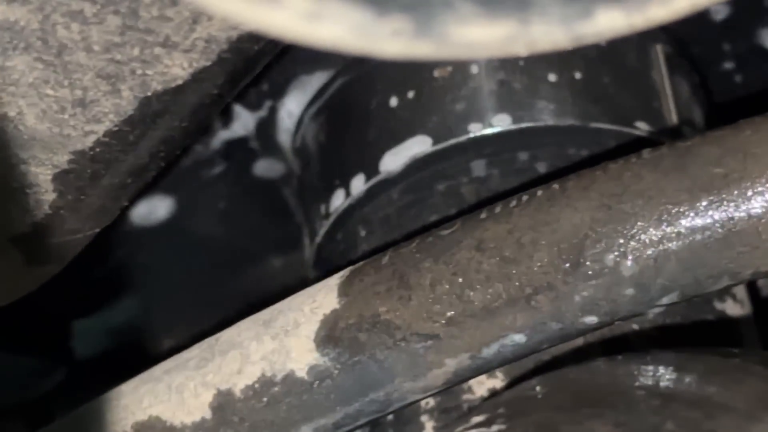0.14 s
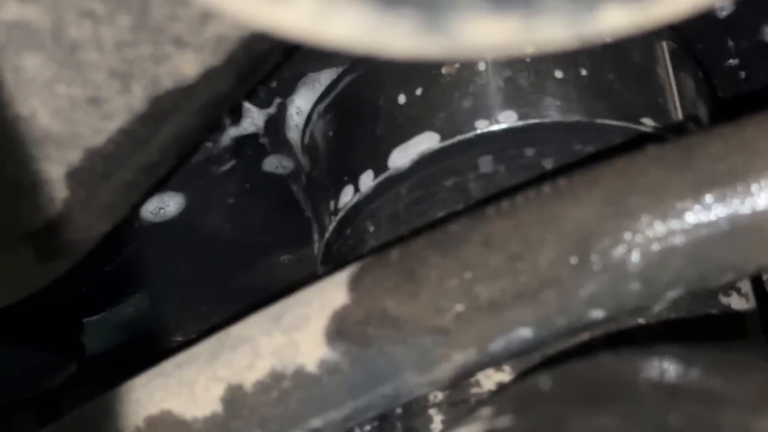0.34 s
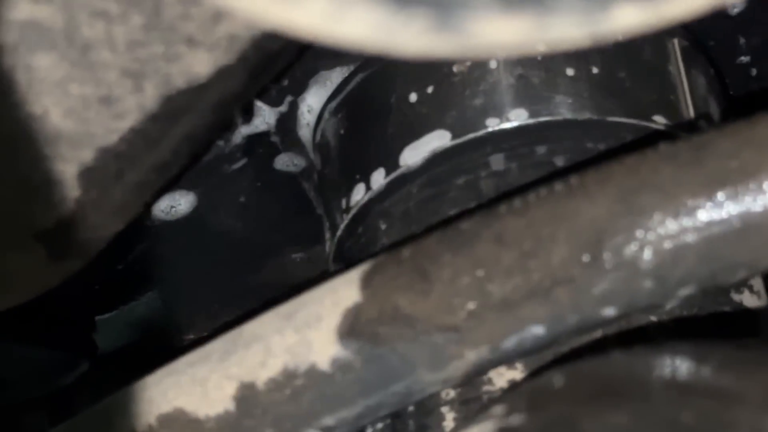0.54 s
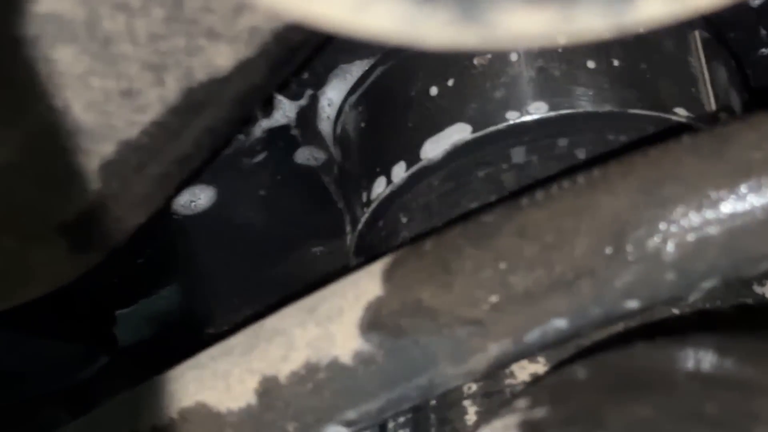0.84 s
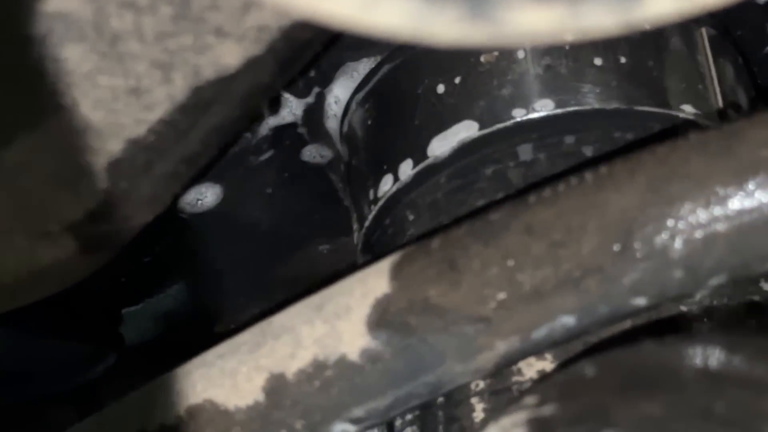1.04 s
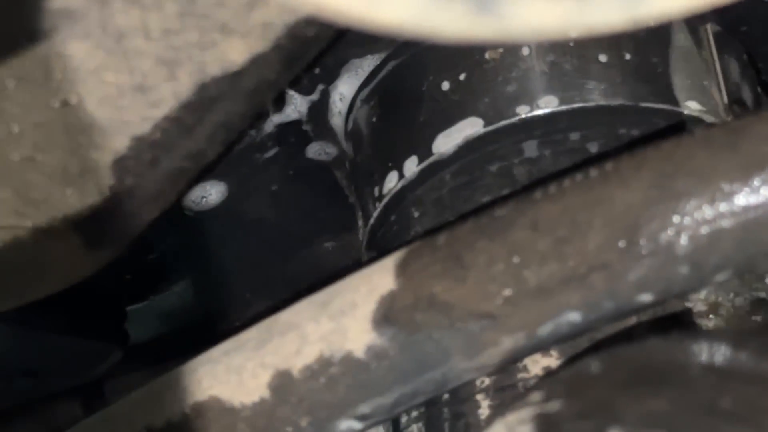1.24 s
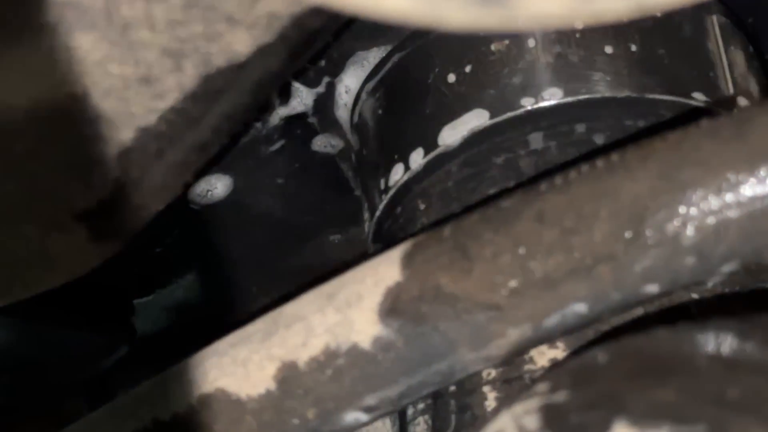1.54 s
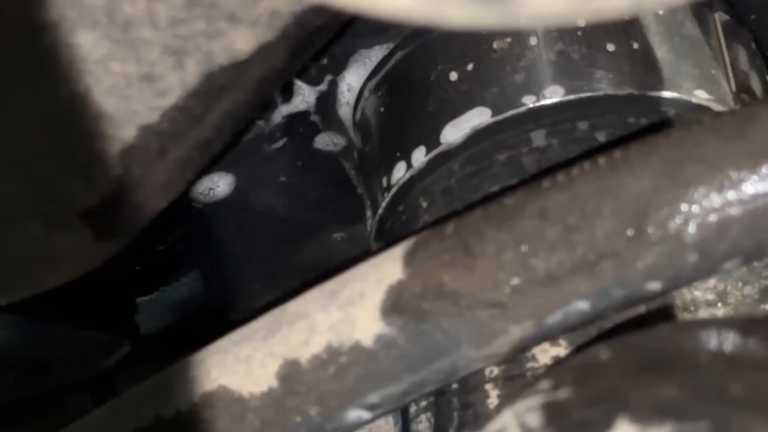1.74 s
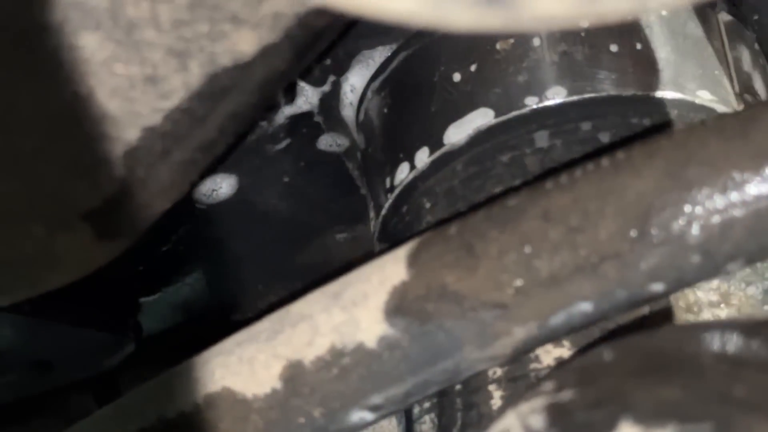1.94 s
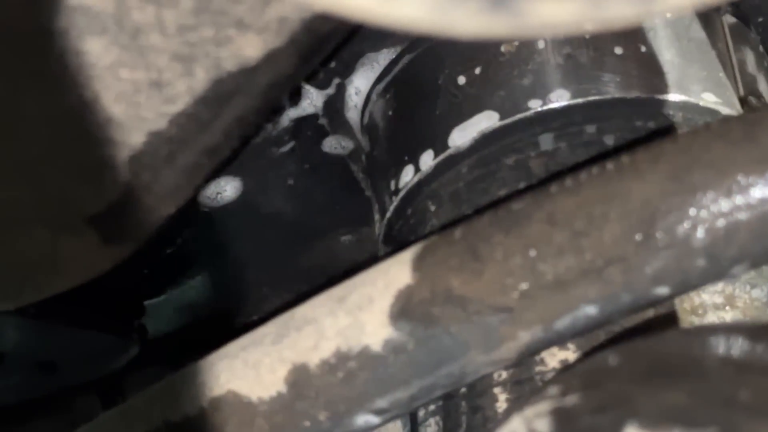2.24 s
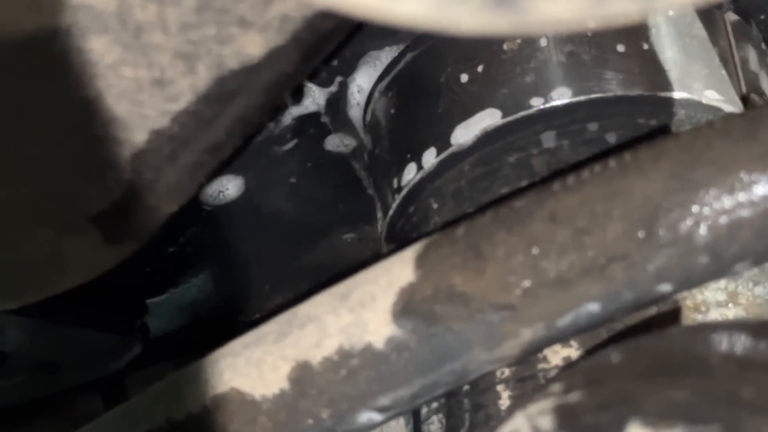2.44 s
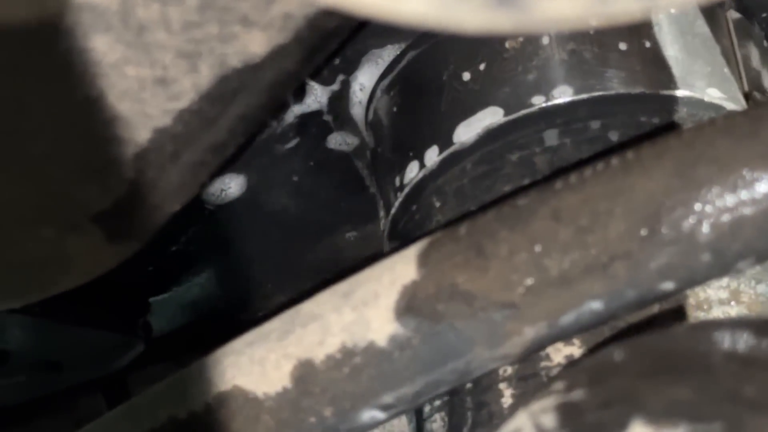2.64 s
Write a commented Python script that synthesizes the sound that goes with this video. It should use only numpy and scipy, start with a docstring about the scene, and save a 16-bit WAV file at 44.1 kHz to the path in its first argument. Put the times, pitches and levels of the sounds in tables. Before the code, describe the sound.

A constant high, sizzling air leak at a pipe clamp, close up in a workshop, flickers slightly throughout; small wet ticks and a few dull hand knocks come after one second, faint rumble and hum beneath.

```python
"""In a workshop, compressed air escapes steadily from the joints of a pressurised intake pipe near the microphone.
The fluttering jet is shaped noise with clicks for droplets of test fluid; band-passed noise gives the
resonances of the pipe and of the narrow gaps at its clamp. Nearby metal scatters it as dense decaying echoes.
Damped sines and a dull scuff make a few soft handling bumps; low noise and a sine make the rumble and mains hum."""
import sys
import numpy as np
from scipy import signal
from scipy.fft import rfft, irfft
from scipy.io import wavfile

SR = 44100
rng = np.random.default_rng(int(sys.argv[2]) if len(sys.argv) > 2 else 0)


def output_pcm(signal):
    """Save a mono or channel-first signal as 16-bit PCM at the path in sys.argv[1].

    Samples are clipped to [-1, 1] before scaling.
    """
    pcm = np.clip(np.atleast_2d(signal).T, -1, 1) * 32767
    wavfile.write(sys.argv[1], SR, np.round(pcm).astype(np.int16))


N = 123479

# broad spectrum of the jet, before its overall gain: f/Hz, relative level/dB
JET_SPECTRUM = [(900, -27), (1400, -23), (1750, -17.5), (2050, -25), (3000, -31.5), (3600, -29.5),
                (4000, -22), (4220, -29), (4500, -21), (4900, -18.5), (5900, -14), (6600, -6), (7600, -4),
                (8500, -15), (9300, -10), (10300, -3.5), (12000, 2), (14100, -4.5), (15000, -5.5),
                (15700, -7)]
# resonances of the pipe: f/Hz, width of one filter stage/Hz, mean peak level over the jet noise/dB
PIPE_RESONANCES = [(830, 85, 5.5), (1152, 92, 7.5), (2163, 32.6, 19.5), (2255, 83, 20.5), (2643, 127, 10.5),
                   (3273, 36, 16), (3791, 93, 14), (4330, 35, 11.5)]
# resonances of the gaps round the joint: f/Hz, width of one filter stage/Hz, mean peak level over the jet noise/dB
GAP_RESONANCES = [(6213, 67, 4.5), (6623, 290, 5), (6970, 73, 4), (7948, 110, 13.5), (8454, 490, 17.5),
                  (8914, 284, 15.5), (9527, 74, 13.5), (12620, 220, 7), (13380, 220, 9.5), (13900, 35, 17),
                  (13740, 280, 7.5), (14130, 250, 8.5), (14150, 150, 12.5), (15400, 170, 7.5)]
# big droplets: t/s, level against the jet noise/dB
BIG_DROPLETS = [(0.912, 24), (1.710, 17.5), (1.822, 22)]
# phase by which the right microphone port leads the left: f/Hz, phase/rad
PORT_LEAD = [(6100, 0), (7000, 1.0), (7450, 3.1), (7900, 5.1), (8200, 6.2), (9000, 5.8), (9600, 4.8),
             (10000, 4.0), (10600, 3.14), (11750, 3.14), (12100, 2.3), (13000, 1.4), (13700, .6),
             (14100, 0)]
# diffuse hiss, of opposite sign at the two ports: f/Hz, level against the direct hiss/dB
DIFFUSE_HISS = [(900, -1.5), (1150, -7), (1400, 7), (1900, -3), (2150, -41.5), (5800, -57), (7000, -8),
                (7450, -56), (7900, -8.5), (8500, -12), (9700, -21), (10300, -4), (10700, -90),
                (11700, -77), (12000, -12.5), (13300, -10), (14300, -17)]
# spectrum of the workshop rumble, before its overall gain: f/Hz, relative level/dB
RUMBLE_SPECTRUM = [(20, -84), (40, -75.5), (63, -61), (85, -63.5), (105, -69.5), (160, -71), (350, -77),
                   (500, -82), (850, -88), (1200, -106.5), (3000, -125)]
# left-right difference of the rumble: f/Hz, side level against mid/dB
RUMBLE_SIDE = [(25, -32), (60, -23), (120, -13), (280, -13), (450, -16), (900, -6)]
# modes of a bump, before onset and bump level: f/Hz, relative level/dB, T60/s
KNOCK_MODES = [(92, -3.5, 0.09), (164, -5, 0.066), (290, 0.5, 0.051), (334, -3, 0.043), (610, -22, .04),
               (825, -5, 0.041)]
# handling bumps: t/s, level/dB
HANDLING_BUMPS = [(1.192, -39), (1.248, -34.5), (1.281, -24.5), (1.824, -33)]

# _DB spreads are standard deviations; walk rates are in Hz
JET_DB = -15
FLUTTER_DB, FLUTTER_HZ = 0.29, 25
SWAY_DB, SWAY_HZ = 0.45, 3.2
DROPLETS_PER_S, DROPLET_MIN_DB, DROPLET_SIZE_DB = 180, 8, 3  # levels against the jet noise
SCATTER_DB, SCATTER_T60_S, SCATTER_DRIFT_HZ = -14, 0.13, 0.8  # level against the direct sound
SCUFF_HZ, SCUFF_WIDTH_HZ, SCUFF_DB, SCUFF_T60_S = 230, 310, -9, 0.099
BUMP_ATTACK_S = 0.009
RUMBLE_DB, RUMBLE_SWELL_DB, RUMBLE_SWELL_HZ = -0.4, 0.5, 24.0
HUM_HZ, HUM_DB, HUM_WAVER_DB, HUM_WAVER_HZ = 119.2, -53, 4, 1.6
HUM_PHASE_RAD, HUM_PHASE_HZ = 0.57, 2.4
TOP_HZ = 15760

TIME = np.arange(N) / SR
SIDES = np.array([[1], [-1]])  # left, right


def droplets():
    """Impulsive excitation: droplets torn off by the jet are random lone clicks, plus a few big ones."""
    chance, size = rng.random(N), rng.standard_normal(N)
    level_db = DROPLET_MIN_DB + DROPLET_SIZE_DB * np.minimum(abs(size), 3)
    clicks = (chance < DROPLETS_PER_S / SR) * np.sign(size) * undb(level_db)
    for start, db in BIG_DROPLETS:
        clicks[int(start * SR)] += undb(db)
    return clicks


def jet():
    """Turbulent noise and resonance: broadband flow noise, droplets and ringing cavities share one flutter."""
    air = rng.standard_normal(N) + droplets()
    for hz, width, db in list(PIPE_RESONANCES) + list(GAP_RESONANCES):
        ringing = irfft(noise() * resonance(hz, width), N)
        air = air + ringing * undb(db + SWAY_DB * walk(SWAY_HZ))
    fluttering = air * undb(FLUTTER_DB * walk(FLUTTER_HZ))
    return rfft(fluttering) * undb(JET_DB + curve(JET_SPECTRUM))


def reflections():
    """Multiple scattering: a dense, exponentially decaying cluster of echoes with unit energy."""
    tail = rng.standard_normal(N) * undb(-60 * TIME / SCATTER_T60_S)
    return rfft(tail / np.sqrt(np.sum(tail ** 2)))


def leak():
    """Interference and diffusion: the ports differ in phase, and close echoes shift as the hand drifts."""
    apart, echo = undb(curve(DIFFUSE_HISS)), undb(SCATTER_DB)
    mixed = (jet() + SIDES * apart * jet()) / np.hypot(1, apart)  # power kept
    ports = mixed * np.exp(-.5j * SIDES * curve(PORT_LEAD))
    # cosine and sine weights turn one echo pattern into another
    turn = walk(SCATTER_DRIFT_HZ)
    first = irfft(ports * reflections(), N)
    second = irfft(ports * reflections(), N)
    echoes = np.cos(turn) * first + np.sin(turn) * second
    return (irfft(ports, N) + echo * echoes) / np.hypot(1, echo)


def bump(start, level_db):
    """Damped free vibration: a soft knock rings a few low modes, with a dull scuff of the grip."""
    age = np.maximum(TIME - start, 0)
    ring = 0
    for hz, db, t60 in KNOCK_MODES:
        ring = ring + undb(db) * decay(age, t60) * np.sin(2 * np.pi * hz * age)
    rub = irfft(noise() * resonance(SCUFF_HZ, SCUFF_WIDTH_HZ), N)
    scuff = rub / rub.std() * undb(SCUFF_DB) * decay(age, SCUFF_T60_S)
    onset = 1 - np.exp(-age / BUMP_ATTACK_S)  # zero before the start
    return undb(level_db) * onset * (ring + scuff)


def rumble():
    """Partial coherence: low room noise is a common part plus a part of opposite sign at the ports."""
    both = noise() + SIDES * undb(curve(RUMBLE_SIDE)) * noise()
    shaped = both * undb(curve(RUMBLE_SPECTRUM)) * np.sqrt(SR / 2)  # unit power per Hz before shaping
    return irfft(shaped, N) * undb(RUMBLE_DB + RUMBLE_SWELL_DB * walk(RUMBLE_SWELL_HZ))


def hum():
    """Modulated tone: the mains hum is one sine whose phase and level waver."""
    phase = 2 * np.pi * HUM_HZ * TIME + HUM_PHASE_RAD * walk(HUM_PHASE_HZ)
    tone = np.sqrt(2) * np.sin(phase)  # unit RMS
    return tone * undb(HUM_DB + HUM_WAVER_DB * walk(HUM_WAVER_HZ))


def undb(db):
    """Logarithmic level: converts decibels to an amplitude ratio."""
    return 10 ** (np.asarray(db) / 20)


def bins():
    """Discrete Fourier analysis: frequency of each spectral bin in Hz."""
    return np.arange(N // 2 + 1) * SR / N


def curve(points):
    """Logarithmic interpolation: joins (f/Hz, value) points by lines over log frequency."""
    hz, value = np.array(points, float).T
    return np.interp(np.log(bins() + 1), np.log(hz), value)


def noise():
    """White noise: the spectrum of independent samples of unit power."""
    return rfft(rng.standard_normal(N))


def walk(rate):
    """Low-pass filtered chance: zero mean, unit spread, spectral gain 1/e at rate Hz."""
    slow = irfft(noise() * np.exp(-(bins() / rate) ** 2), N)
    return (slow - slow.mean()) / slow.std()


def resonance(hz, width):
    """Driven oscillator: two equal band-pass stages in cascade, gain 1 at the centre."""
    f = bins()
    stage = 1j * f * width / (hz ** 2 - f ** 2 + 1j * f * width)
    return stage ** 2


def decay(age, t60):
    """Exponential damping: amplitude falls by 60 dB in t60 seconds."""
    return np.exp(-np.log(1000) * age / t60)


def scene():
    """Superposition: the leak and the bumps add to the workshop background."""
    bumps = sum(bump(start, db) for start, db in HANDLING_BUMPS)
    return leak() + bumps + rumble() + hum()


def record(dry):
    """Band limitation: the recorder cuts the top with a steep elliptic low-pass."""
    low_pass = signal.ellip(16, .1, 80, TOP_HZ, fs=SR, output="sos")  # order, ripple/dB, stop-band loss/dB
    return signal.sosfilt(low_pass, dry)


dry = scene()
out = record(dry)
output_pcm(out)
```